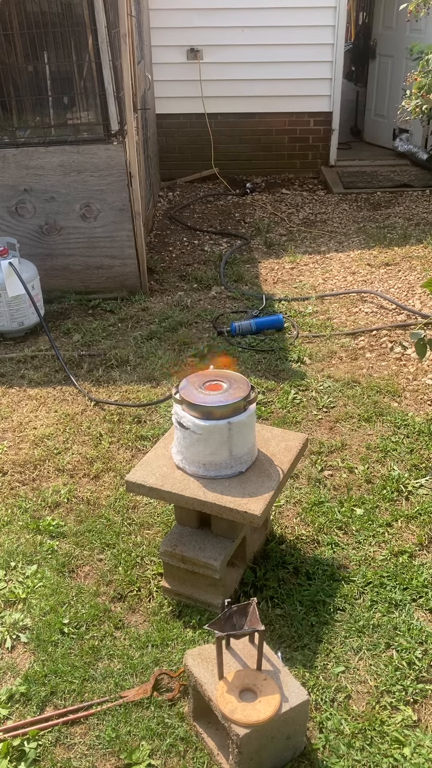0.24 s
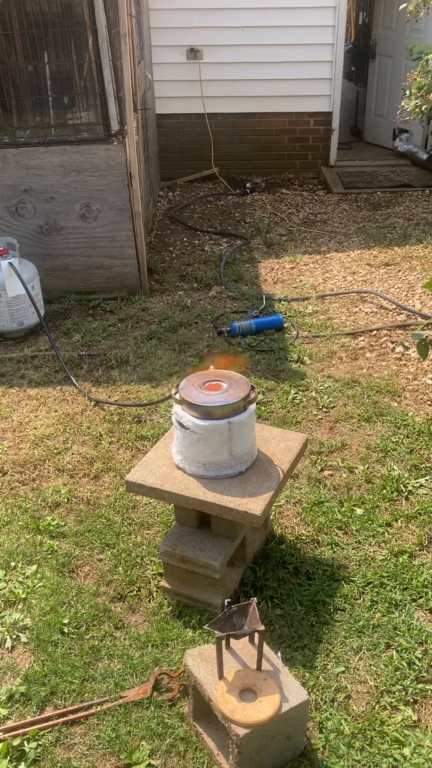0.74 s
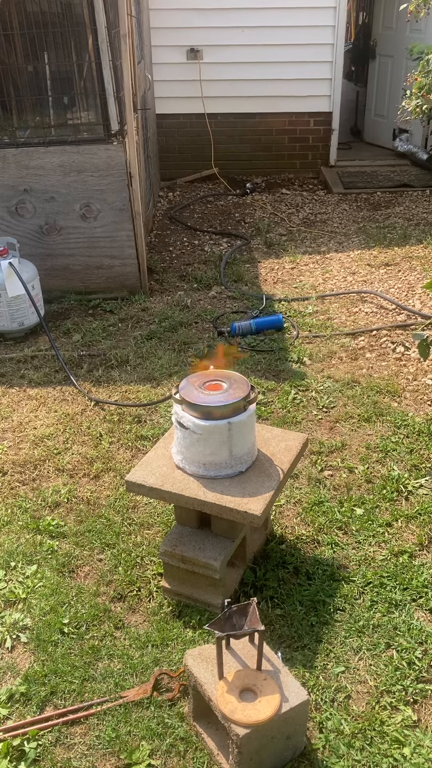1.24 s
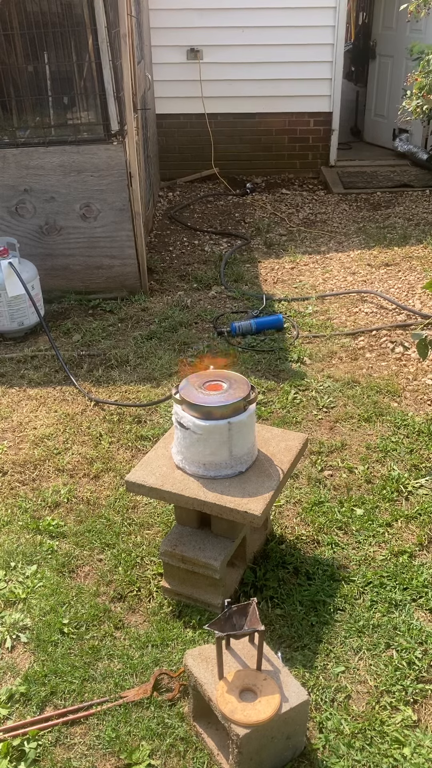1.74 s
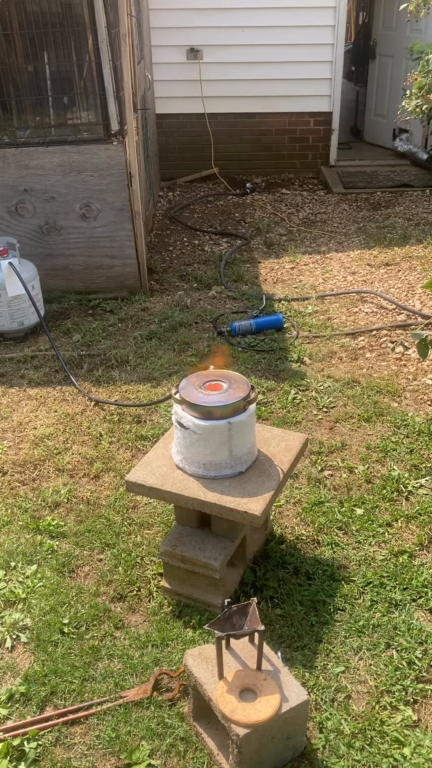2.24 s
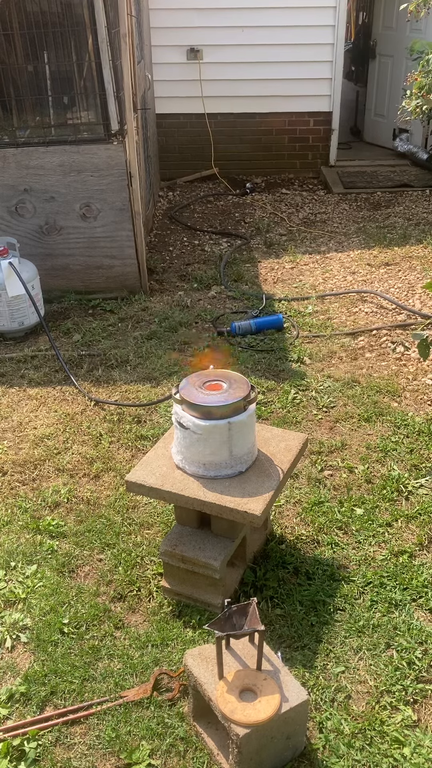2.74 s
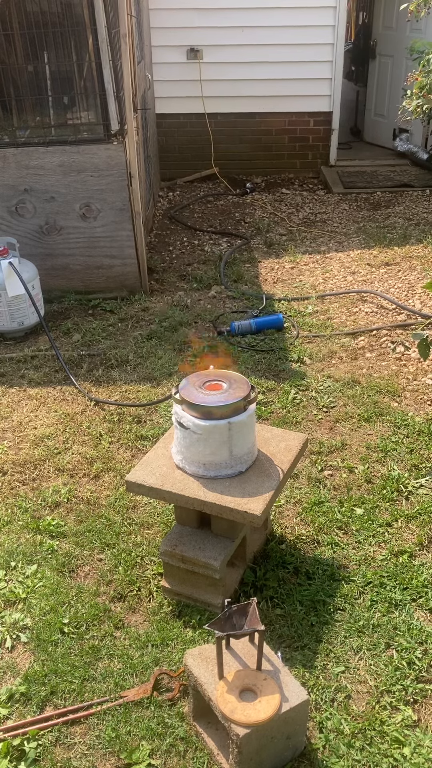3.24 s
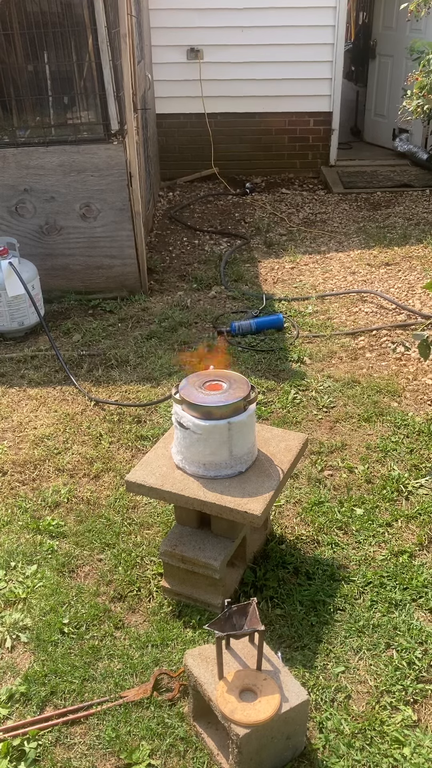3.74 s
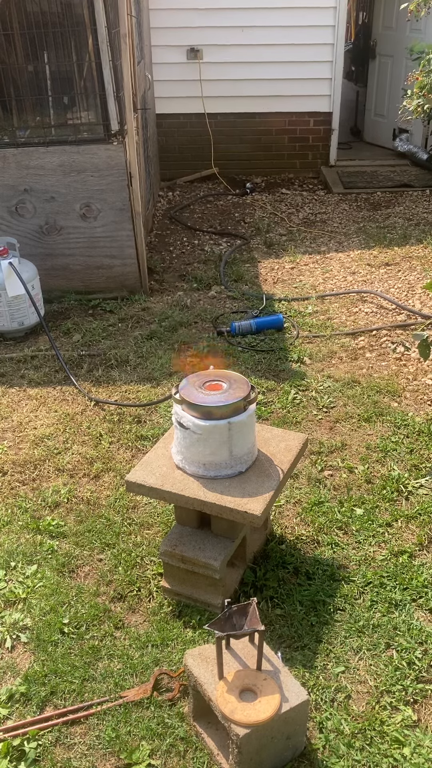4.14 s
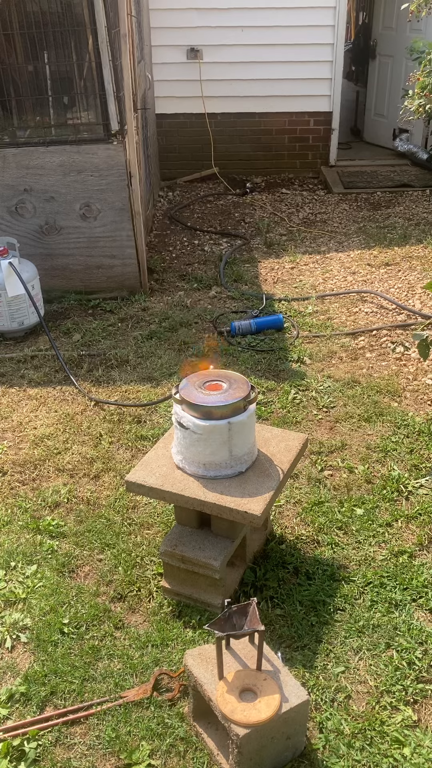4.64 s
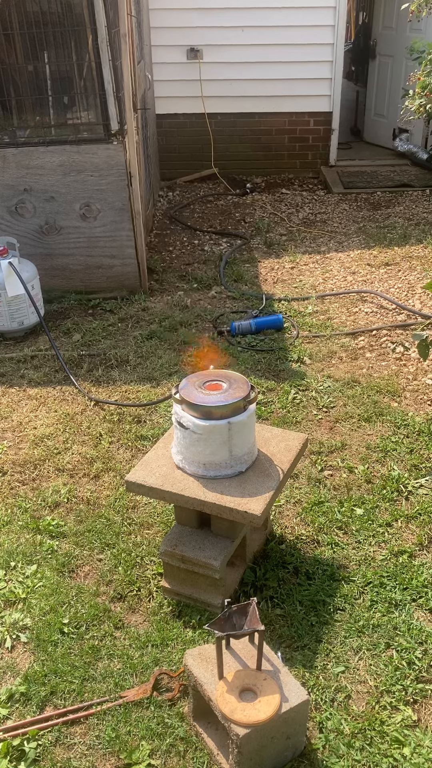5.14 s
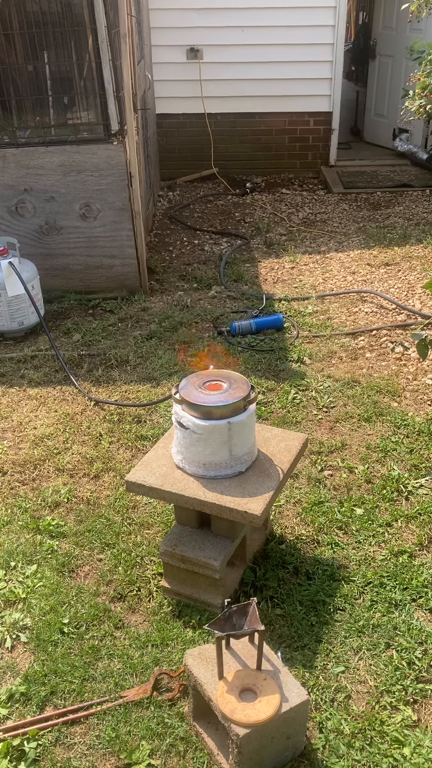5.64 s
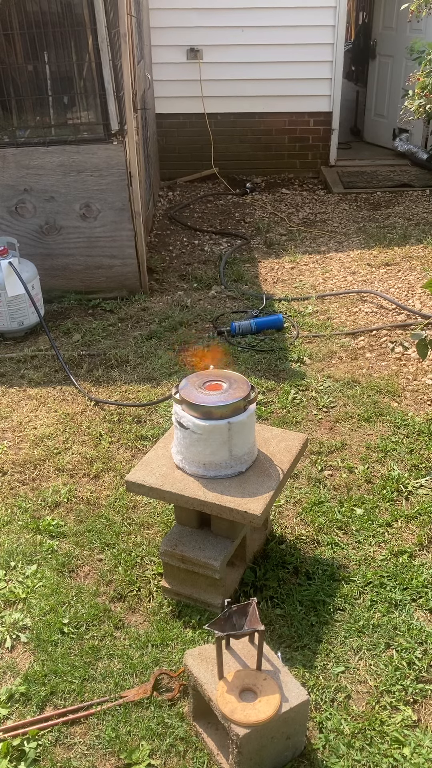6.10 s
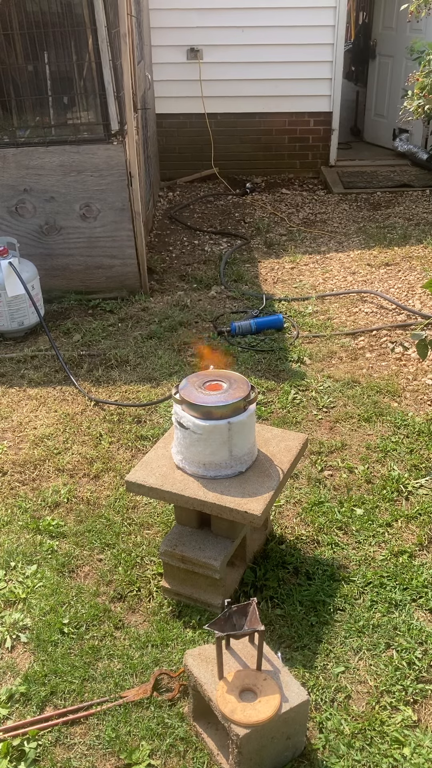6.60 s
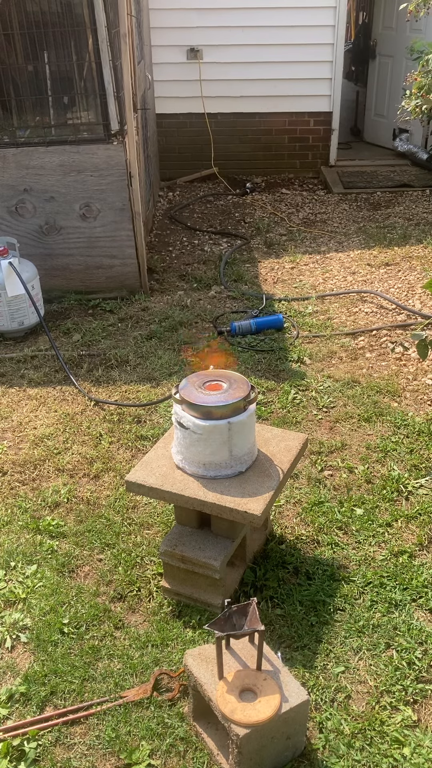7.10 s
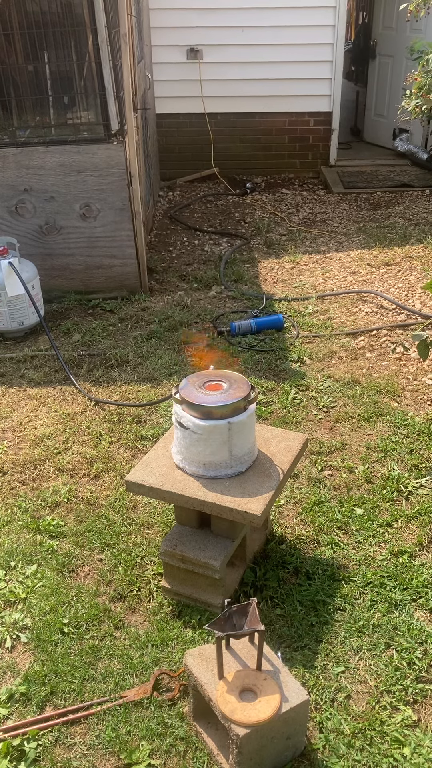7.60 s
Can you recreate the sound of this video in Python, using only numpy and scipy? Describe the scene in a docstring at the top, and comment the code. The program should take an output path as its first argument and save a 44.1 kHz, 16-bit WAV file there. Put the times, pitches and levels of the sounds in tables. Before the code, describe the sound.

A small gas furnace burns outdoors with a steady low rumble, while metal tools knock and clink a few times.

```python
"""A low flame rumbles in a small propane furnace, a few steps from a two-port microphone in a back yard.
It booms in the chamber and echoes off house and sheds. Gas hisses and faintly whistles at the burner,
and exhaust rushes from the lid. Someone shuffles in the grass and handles metal tools, which scrape
and clink a few times. Far off, an insect swells about once a second."""
import sys
import numpy as np
from scipy import signal
from scipy.fft import rfft, irfft
from scipy.io import wavfile
from scipy.ndimage import uniform_filter1d

SR = 44100
rng = np.random.default_rng(int(sys.argv[2]) if len(sys.argv) > 2 else 0)


def transcribe(u):
    """Save the signal u as a 16-bit wav file named by the first command-line argument.

    u: samples, shape (n,) or (channels, n), limited to [-1, 1]; the rate is SR.
    q: integer samples, one column per channel.
    """
    v = np.clip(np.atleast_2d(u).T, -1, 1)
    q = np.round(v * 32767).astype(np.int16)
    wavfile.write(sys.argv[1], SR, q)


N = 346626
TIME = np.arange(N) / SR
HZ = np.maximum(np.fft.rfftfreq(N, 1 / SR), 1)

# Tools touching. Each row: start in seconds, knock in dB, ring in dB, contact brightness in Hz,
# favoured mode in Hz, rebound gap in seconds, knock lost per rebound in dB, knock boost in dB,
# centre of that boost in Hz.
TOUCHES = [(1.059, -34.5, -40.5, 13000, 3990, .002, 3.5, 0, 1500),
           (4.666, -32.5, -43, 12000, 5410, .002, 3, 0.5, 5400),
           (4.667, -39, -34.5, 9100, 4120, .0022, 3, 3, 4000),
           (4.673, -45, -36.5, 6040, 2360, .003, 1.5, -1.5, 2400),
           (4.768, -37, -50.5, 10000, 6600, .0015, 11.5, 15, 846),
           (4.7931, -39, -33.5, 12000, 3880, .0015, 4, 4.5, 4000),
           (4.8409, -11, -22, 4000, 2450, .002, 15.5, 2.5, 614),
           (4.847, -31, -28.5, 4810, 4215, .003, 6.5, -1.5, 2500),
           (6.031, -44, -56.5, 2400, 1470, 0.0018, 6, 0, 1300),
           (6.537, -42.5, -48, 4970, 3990, .0025, 5.5, 5, 1292),
           (6.582, -37, -38, 6000, 3530, 0.0031, 2.5, 1, 1300),
           (6.629, -33, -50.5, 4500, 3530, 0.0026, 2.5, 3, 1495),
           (6.674, -34, -57.5, 1596, 1470, .003, 4.5, 3, 1053),
           (6.747, -40, -57, 4000, 2560, 0.0019, 7, -0.5, 1303),
           (6.773, -38, -40, 6000, 1470, .002, 7, -1.5, 1300),
           (6.8155, -23.5, -23, 4600, 1470, .0015, 7.5, 7, 1296),
           (6.8209, -26.5, -27, 6200, 4330, 0.0022, 3, 5.5, 1300),
           (6.827, -29, -32, 6000, 5120, 0.0017, 6.5, 3.5, 1276),
           (6.883, -45.5, -35.5, 5020, 3530, 0.0014, 11, 1, 3570)]


def flame(hum_hz=81.5, hum_db=-15, throat_hz=299, throat_db=-11, level_db=1.5):
    """Turbulent burning booms in the chamber: its lowest mode hums and its throat pulses."""
    # Flame noise leaving the chamber. Each row: frequency in Hz, level in dB.
    roar_spectrum = [(15, -37.5), (28, -34), (45, -19), (70, -3.5), (84, -4.5), (120, -6.5), (200, -6),
                     (260, 1), (305, 2.5), (360, -1), (410, -7.5), (490, -20.5), (800, -81)]
    # Strength of the flame. Each row: time in seconds, level in dB.
    strength = [(0.5, -22.5), (1.59, -25.5), (4.47, -24.5), (4.74, -25), (7.86, -23.5)]
    hum = from_db(hum_db) * steadied(noise(resonance(hum_hz, width_hz=6)), span_s=.68)
    throat = from_db(throat_db) * noise(resonance(throat_hz, width_hz=14))
    roar = rms_one(yard(noise(colour(roar_spectrum))))
    burning = steadied(roar + hum + throat, span_s=.22)  # the steady gas feed holds the power even
    return from_db(level_db + over_time(strength)) * sputtering(settling(burning))


def settling(rumble, start_db=-14, settle_s=.53):
    """The middle of the rumble comes up to full strength in the first moments."""
    middle = filtered(rumble, resonance(hz=213, width_hz=170))
    return rumble + middle * (from_db(start_db * np.exp(-TIME / settle_s)) - 1)


def sputtering(rumble, boom_db=-.5, throb_db=1.65, throb_hz=18, flare_s=.0057):
    """Uneven burning makes the chamber's boom throb; now and then a puff drives it to a firm peak."""
    # Slow changes of the boom against the rest of the rumble. Each row: time in seconds, gain in dB.
    boom_trend = [(0, -2), (.7, -1), (1.2, -0.4), (1.8, 2), (3.2, 0.2), (3.85, -.5), (4.35, -1.3),
                  (5.0, -0.4), (5.55, -2.2), (6.4, -1.5), (7.3, -1), (7.86, -1)]
    # Short puffs of flame. Each row: time in seconds, level in dB over the average boom.
    flares = [(0.395, 6), (0.681, 5), (1.443, 5), (1.705, 5.5), (1.987, 6.5), (2.464, 7), (2.923, 8.5),
              (3.34, 11), (3.381, 8.5), (4.192, 5.5), (4.267, 7.5), (4.395, 9.5), (6.232, 8), (6.54, 7.5),
              (7.283, 4.5), (7.836, 7.5)]
    boom = filtered(rumble, resonance(hz=310, width_hz=170))
    throbbing = boom * from_db(boom_db + over_time(boom_trend) + throb_db * drift(throb_hz))
    driven = steadied(boom, span_s=.01) * np.std(boom)
    for s, db in flares:
        throbbing = throbbing + swell(s, flare_s, flare_s) * (from_db(db) * driven - throbbing)
    return rumble - boom + throbbing


def gas(jet_db=-51, whistle_db=-56.5, exhaust_db=-53.5, surge_db=4.5, surge_s=5.0, surge_rise_s=.44):
    """The jet hisses and whistles in the burner tube; hot exhaust rushes from the lid, then surges."""
    # Hiss of the jet. Each row: frequency in Hz, level in dB.
    jet_spectrum = [(350, -34), (550, 10), (880, -5), (1250, -14), (2000, -14), (2500, -13.5), (2950, -11),
                    (4200, -15.5), (5000, -23.5), (6200, -29.5), (7400, -43), (10000, -51.5),
                    (13000, -63.5)]
    # Rush at the lid. Each row: frequency in Hz, level in dB.
    exhaust_spectrum = [(400, -16.5), (650, 9.5), (1000, -3.5), (1600, -4), (2200, -9), (3500, -21.5),
                        (7000, -64)]
    burner = from_db(jet_db) * noise(colour(jet_spectrum)) + from_db(whistle_db) * whistling()
    flow_db = exhaust_db + surge_db * np.clip((TIME - surge_s) / surge_rise_s, 0, 1)
    exhaust = from_db(flow_db) * noise(colour(exhaust_spectrum))
    return filtered(burner + exhaust, clutter(t60=.24, db=-16))


def whistling(waver_db=2.5, waver_hz=5, groups=3):
    """The burner tube's narrow resonances swell and fade in groups as the jet wavers."""
    # Resonances of the tube. Each row: frequency in Hz, width in Hz, level in dB.
    tube_modes = [(1051, 100, 10), (1372, 30, -1.5), (1763, 18, -7.5), (2185, 15, -2.5), (2360, 50, -6),
                  (2530, 76, 4.5), (2710, 65, 0), (3050, 20, -7), (3140, 30, -2), (3360, 28, -10.5),
                  (3775, 33, -6), (3990, 110, -4.5), (4190, 96, -5), (4510, 82, -8)]
    out = 0
    for k in range(groups):
        response = sum(from_db(db) * resonance(hz, width) / np.sqrt(width)
                       for hz, width, db in tube_modes[k::groups])
        out += np.linalg.norm(response) * noise(response) * from_db(waver_db * drift(waver_hz))
    return rms_one(out)


def orifice(hz=3657, wander_hz=4, wander_rate_hz=8, waver_db=1.0):
    """The gas orifice holds one thin tone that wanders a little in pitch and strength."""
    # Strength of the tone. Each row: time in seconds, level in dB.
    strength = [(0, -73.5), (0.6, -75), (1.3, -68.5), (2.1, -70.5), (2.65, -78), (2.8, -69.5), (3.5, -68.5),
                (3.8, -68), (4.3, -69), (5.3, -69), (5.7, -67.5), (6.25, -73), (6.5, -68.5), (7.3, -67),
                (7.5, -67), (7.86, -71)]
    pitch_hz = hz + wander_hz * noise(1 / (1 + (HZ / wander_rate_hz) ** 2))
    level = from_db(over_time(strength) + waver_db * drift(rate_hz=4))
    return level * np.sqrt(2) * np.sin(2 * np.pi * np.cumsum(pitch_hz, axis=1) / SR)


def clinks(boost_octaves=.84, favour_width_hz=130, other_modes_db=-20, echo_s=.026, echo_db=-14):
    """Steel knocks on a block and rings once it rebounds; the house wall answers."""
    # Modes of the dry knock. Each row: frequency in Hz, level in dB, t60 in seconds.
    knock_modes = [(633, -4.5, 0.025), (805, -8.5, 0.017), (1026, -3.5, 0.011), (1300, -3.5, 0.01),
                   (1580, -5.5, 0.0052), (2310, -3.5, .009), (2480, -3.5, 0.017), (2720, -5, 0.011),
                   (3470, -4, 0.0072), (3820, -10, 0.017), (4080, -11.5, 0.018), (4560, -7.5, 0.014),
                   (4790, -3.5, 0.003), (6340, -22, .006)]
    # Modes of the ringing steel. Each row: frequency in Hz, level in dB, t60 in seconds.
    steel_modes = [(1470, -6, .06), (2360, -3, .08), (2560, -5, .04), (2900, -3, .06), (3530, -5, .06),
                   (3860, -2, .025), (3990, -5, .05), (4120, -3, .03), (4215, -3, .045), (4480, -4, .025),
                   (5120, -11, .07), (5450, -8, .025), (6600, -12, .035), (7200, -11, .02)]
    start_s, knock_db, ring_db, _, favoured_hz, gap_s, loss_db, boost_db, boost_hz = np.transpose(TOUCHES)

    def boosted(hz):
        """Each knock lifts or lowers one broad band."""
        return from_db(boost_db * np.exp(-(np.log2(hz / boost_hz) / boost_octaves) ** 2))

    def favoured(hz):
        """The point of contact favours some of the steel's modes."""
        return from_db(other_modes_db) + np.exp(-((hz - favoured_hz) / favour_width_hz) ** 2)

    knock = strike(knock_modes, start_s, knock_db, loss_db, weights=boosted)
    steel = strike(steel_modes, start_s + gap_s, ring_db, loss_db=1.5, weights=favoured)
    direct = clutter(t60=.16, db=-5) + echo(echo_s, echo_db)
    scattered = clutter(t60=.16, db=-2) - 1  # reflections only
    return filtered(knock + steel, np.array([direct, scattered]))


def strike(modes, start_s, level_db, loss_db, weights, contacts=4):
    """Each touch rings the modes and rebounds, losing strength; soft contacts push longer, so duller."""
    _, _, _, bright_hz, _, gap_s, *_ = np.transpose(TOUCHES)
    chance_db = rng.standard_normal((len(start_s), len(modes), contacts))
    unevenness = rng.uniform(.9, 1.1, (len(start_s), contacts))
    pushes = [np.hanning(int(SR / hz) + 2) for hz in bright_hz]
    out = np.zeros(N)
    for k, (hz, db, t60) in enumerate(modes):
        force = np.zeros(N)
        for bounce in range(contacts):
            starts = np.round((start_s + bounce * gap_s * unevenness[:, bounce]) * SR).astype(int)
            sizes = from_db(level_db + db - bounce * loss_db + chance_db[:, k, bounce]) * weights(hz)
            for at, size, push in zip(starts, sizes, pushes):
                force[at:at + len(push)] += size * push / push.sum()
        out += (-1) ** k * ring(force, hz, t60)
    return out


def scrape(grain_db=2.5, grain_hz=150, favour_db=9, favour_width_hz=300):
    """A tool is dragged a short way: grainy friction sounds its resonances, one more than the others."""
    # Resonances of the tool. Each row: frequency in Hz, width in Hz, level in dB.
    tool_modes = [(1850, 160, -8.5), (2400, 190, -11.5), (3230, 84, -2.5), (3980, 200, -13.5)]
    # Drags. Each row: peak time, rise and fall in seconds, level in dB, favoured resonance in Hz.
    drags = [(1.28, 0.068, 0.055, -52, 1820), (1.382, 0.019, 0.017, -56, 3210),
             (6.721, .01, .012, -49, 2450)]
    friction = rng.standard_normal((2, N)) * rms_one(from_db(grain_db * drift(grain_hz)))
    out = 0
    for s, rise_s, fall_s, level_db, favoured_hz in drags:
        body = 0
        for hz, width, db in tool_modes:
            lift_db = favour_db * np.exp(-((hz - favoured_hz) / favour_width_hz) ** 2)
            body += from_db(db + lift_db) * resonance(hz, width)
        out += from_db(level_db) * swell(s, rise_s, fall_s) * rms_one(filtered(friction, body))
    return out


def shuffles(grain_db=2.5, grain_hz=100, relative_width=1.05):
    """Dry grass rubs in short grainy strokes."""
    # Strokes. Each row: peak time and half-length in seconds, level in dB, centre in Hz.
    strokes = [(1.277, 0.11, -51, 2360), (3.695, .012, -70, 5000), (5.707, 0.035, -58, 4520),
               (6.665, 0.36, -56, 2960), (7.193, .017, -73, 4730)]
    grain = rms_one(from_db(grain_db * drift(grain_hz)))
    return grain * sum(from_db(db) * swell(s, half_s, half_s) * noise(resonance(hz, relative_width * hz) ** 2)
                       for s, half_s, db, hz in strokes)


def insect(level_db=-70, first_crest_s=.58, period_s=1.2):
    """A far, high buzz, blurred by distance, swells slowly and falls away at an even pace."""
    # The insect's buzz. Each row: frequency in Hz, level in dB.
    buzz_spectrum = [(3000, -32.5), (4300, -2), (5200, -2.5), (6100, -9), (6800, -23), (8000, -34.5)]
    crests = first_crest_s + period_s * np.arange(np.ceil(TIME[-1] / period_s))
    swells = sum(swell(s, rise_s=.41, fall_s=.21) for s in crests)
    return from_db(level_db) * noise(colour(buzz_spectrum)) * swells


def yard(x, dull_hz=900):
    """Wall echoes ripple the sound's spectrum; rough boards and leaves send back less treble."""
    # Walls around the yard. Each row: delay in seconds, level of the echo's bass in dB.
    walls = [(.0205, -22), (.0226, -15.5), (.0268, -24), (.0306, -12), (.0348, -14), (.0361, -14),
             (.0401, -18), (.0497, -23), (.0543, -21.5)]
    echoes = sum(echo(s, db) for s, db in walls)
    return filtered(x, 1 + echoes / np.hypot(1, HZ / dull_hz))


def echo(delay_s, db):
    """Frequency response of one reflection."""
    return from_db(db) * np.exp(-2j * np.pi * HZ * delay_s)


def clutter(t60, db):
    """Response of the direct path plus a short spray of reflections from blocks, boards and ground."""
    spray = rng.standard_normal(N) * from_db(-60 * np.minimum(TIME / t60, 4))
    return 1 + from_db(db) * rfft(spray / np.sqrt(np.sum(spray ** 2)))


def microphone(x):
    """Direct sound reaches both ports alike, scattered sound oppositely; each has its gain and phase."""
    # The two ports. Each row: frequency in Hz, left minus right in dB, left's lead in radians,
    # likeness from 0 to 1.
    ports = [(90, 2, 0, .97), (200, 2.9, .3, .92), (300, 6.3, .67, .97), (400, 13, .84, .97),
             (450, 15, .65, .55), (510, 6, -1.5, .25), (600, 6, -2.7, .8), (900, .2, -2.2, .85),
             (1500, 0, -1.67, .86), (2900, .3, -2.4, .82), (3550, 2.5, -1.1, .35), (4350, .4, 0, .88),
             (5350, .8, .5, .3), (6500, 1.8, 0, .8)]
    balance_db, lead, alike = over_hz(ports)
    sides = np.array([[1], [-1]])
    direct = filtered(x[0], np.sqrt((1 + alike) / 2))
    scattered = filtered(x[1], np.sqrt((1 - alike) / 2))
    gain = from_db(sides * balance_db / 2)
    gain /= np.sqrt(np.mean(gain ** 2, axis=0))
    return filtered(direct + sides * scattered, gain * np.exp(.5j * sides * lead))


def from_db(db):
    """Decibels to gain."""
    return 10 ** (np.asarray(db) / 20)


def rms_one(x):
    """Scale to unit rms."""
    return x / np.sqrt(np.mean(x ** 2) + 1e-30)


def over_time(rows):
    """Rows of time and value, joined by straight lines."""
    return np.interp(TIME, *np.transpose(rows))


def over_hz(rows):
    """Each column of a frequency table, joined on a log axis."""
    hz, *columns = np.transpose(rows)
    return [np.interp(np.log(HZ), np.log(hz), c) for c in columns]


def colour(points):
    """Gain at every frequency from rows of Hz and dB."""
    return from_db(over_hz(points)[0])


def resonance(hz, width_hz):
    """Gain of a steep-sided resonance, 1 on top."""
    return 1 / (1 + ((HZ ** 2 - hz ** 2) / (HZ * width_hz)) ** 2)


def filtered(x, gain):
    """Pass a sound through a frequency response."""
    return irfft(rfft(x) * gain, N)


def noise(gain):
    """Coloured noise in two unrelated rows: the direct and the scattered sound."""
    return rms_one(filtered(rng.standard_normal((2, N)), gain))


def drift(rate_hz):
    """Slow random motion with a spread of about 1."""
    return noise(1 / (1 + (HZ / rate_hz) ** 2) / np.hypot(1, HZ / (10 * rate_hz)))[0]


def ring(clicks, hz, t60):
    """A unit click sets a sine of height 1 ringing."""
    r, w = from_db(-60 / (t60 * SR)), 2 * np.pi * hz / SR
    return signal.lfilter([0, np.sin(w)], [1, -2 * r * np.cos(w), r * r], clicks + 1e-18)


def swell(s, rise_s, fall_s):
    """A smooth rise and fall around a moment."""
    return np.exp(-((TIME - s) / np.where(TIME < s, rise_s, fall_s)) ** 2)


def steadied(x, span_s):
    """Even out the power over a time span."""
    power = uniform_filter1d(x ** 2, int(span_s * SR), axis=-1, mode="wrap")
    return x / np.sqrt(power + 1e-12)


def scene(handling_top_hz=7300):
    """Furnace and tools a few steps from the microphone, the insect far behind."""
    rumble = microphone(flame())
    lowpass = signal.butter(7, handling_top_hz, fs=SR, output="sos")
    handling = signal.sosfilt(lowpass, shuffles() + scrape() + clinks())
    return rumble + microphone(yard(gas() + handling) + orifice() + insect())


def record(dry, image_db=-67, fade_s=.002, cutoff_hz=14400):
    """The recorder adds a faint image of the rumble around SR / 4; the ends are soft, the top is cut."""
    image = from_db(image_db) * dry * np.cos(np.pi / 2 * np.arange(N))
    to_end_s = np.minimum(TIME, TIME[::-1])
    fades = np.sin(np.pi / 2 * np.minimum(to_end_s / fade_s, 1)) ** 2
    lowpass = signal.ellip(8, .1, 70, cutoff_hz, fs=SR, output="sos")
    return signal.sosfilt(lowpass, fades * (dry + image))


dry = scene()
out = record(dry)
transcribe(out)
```